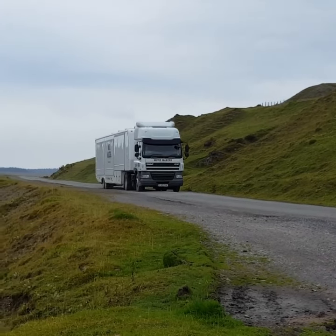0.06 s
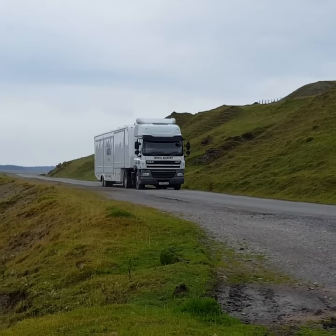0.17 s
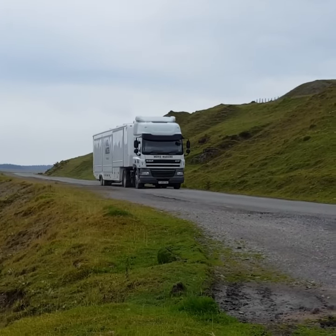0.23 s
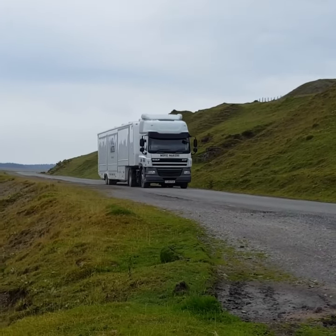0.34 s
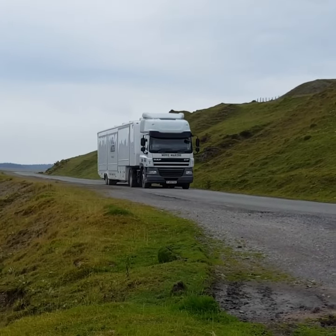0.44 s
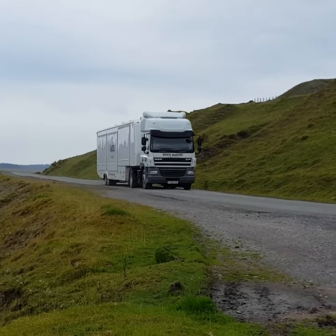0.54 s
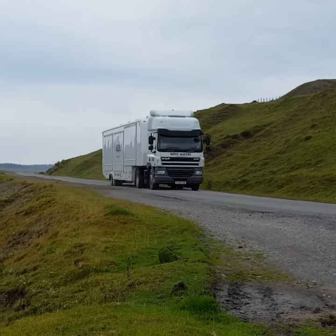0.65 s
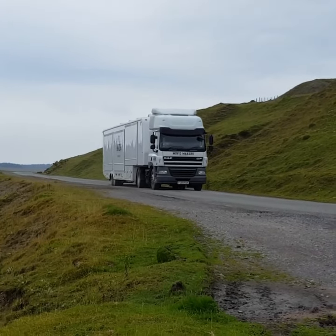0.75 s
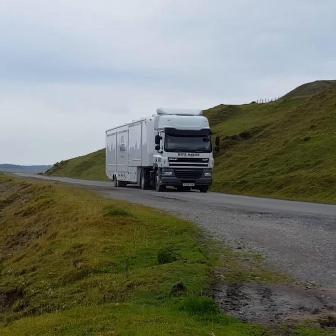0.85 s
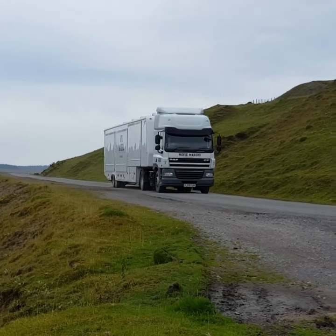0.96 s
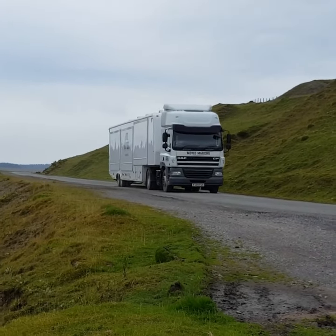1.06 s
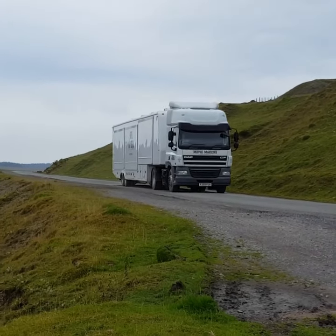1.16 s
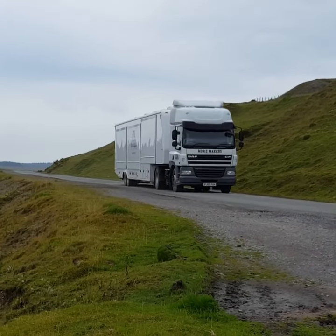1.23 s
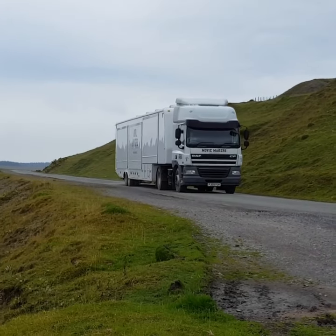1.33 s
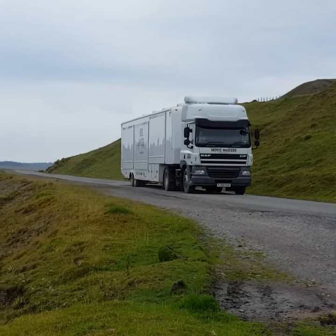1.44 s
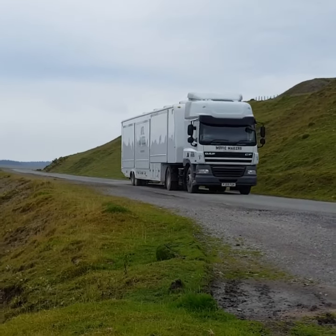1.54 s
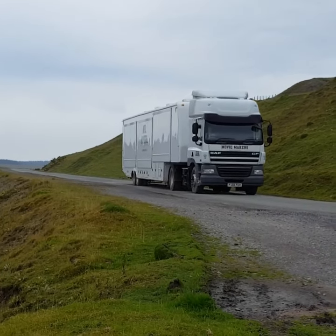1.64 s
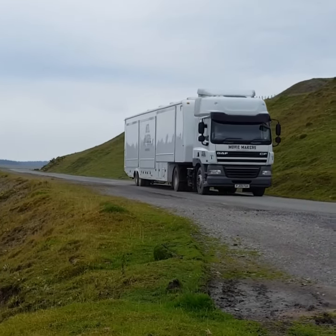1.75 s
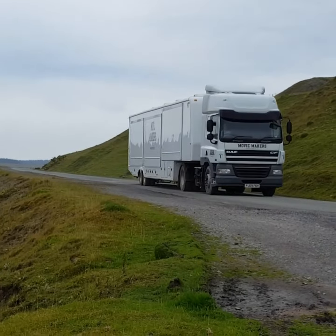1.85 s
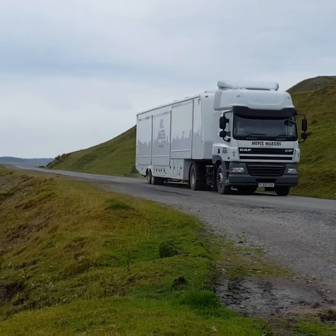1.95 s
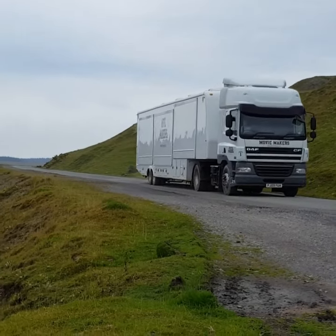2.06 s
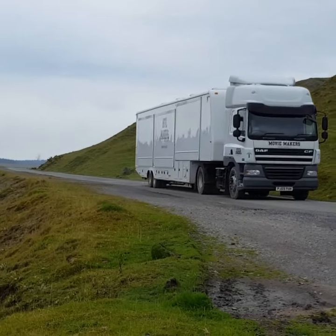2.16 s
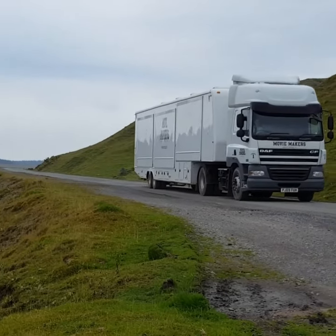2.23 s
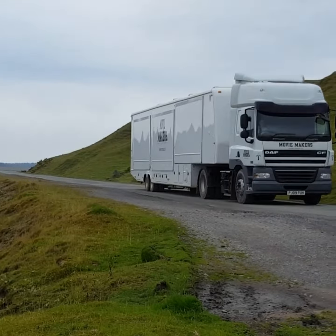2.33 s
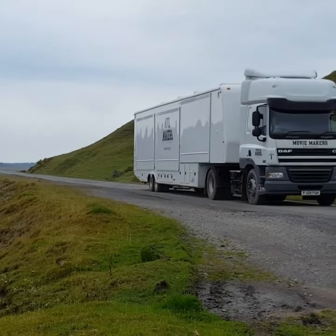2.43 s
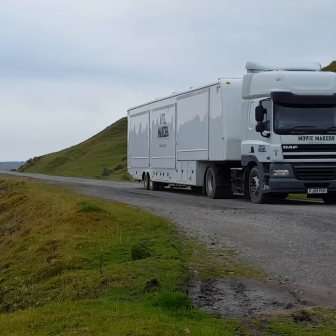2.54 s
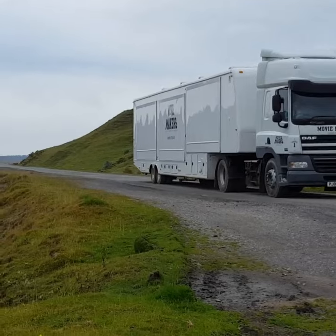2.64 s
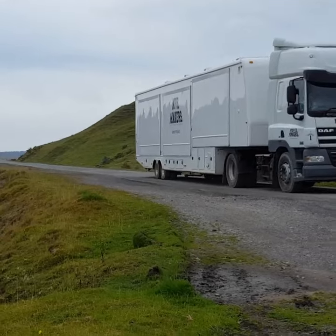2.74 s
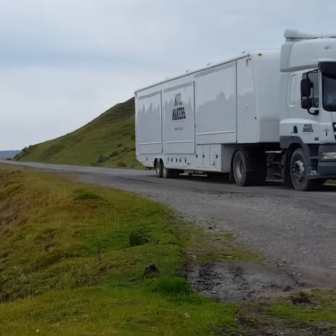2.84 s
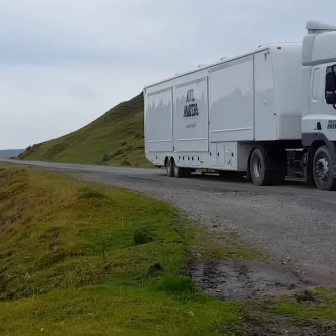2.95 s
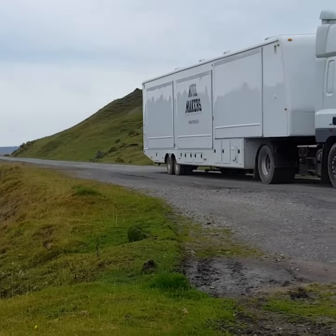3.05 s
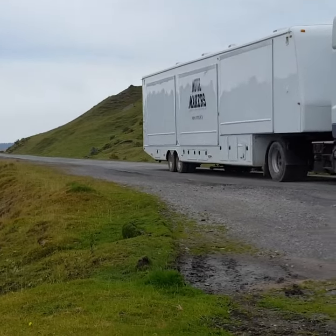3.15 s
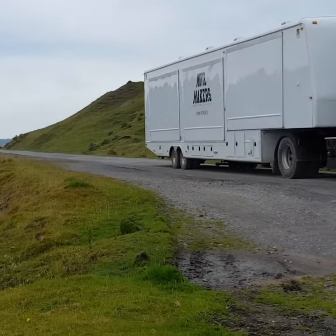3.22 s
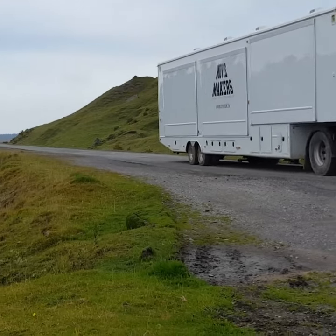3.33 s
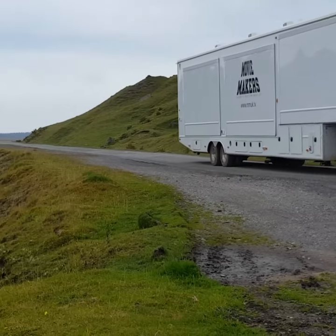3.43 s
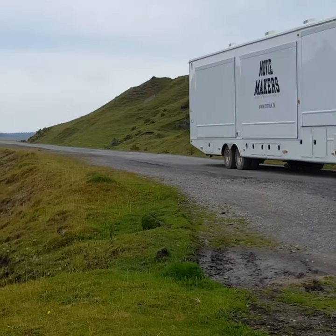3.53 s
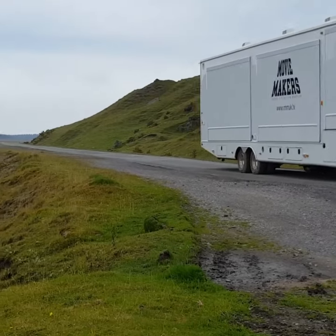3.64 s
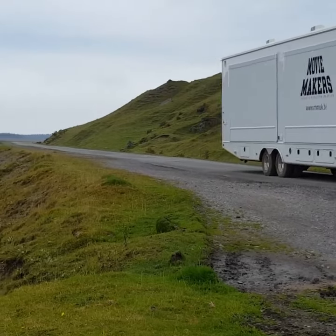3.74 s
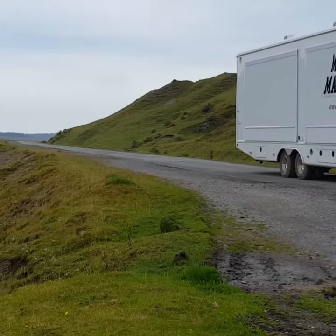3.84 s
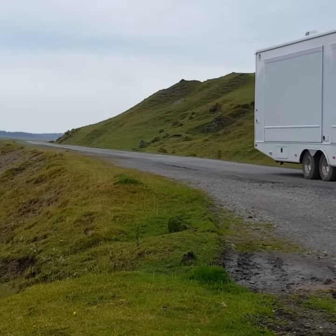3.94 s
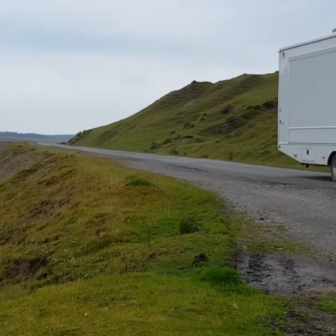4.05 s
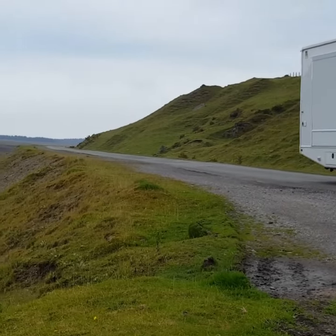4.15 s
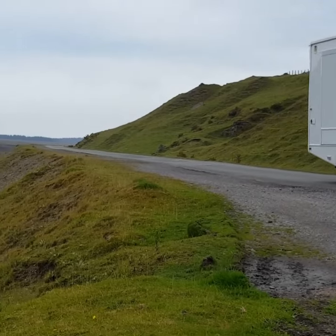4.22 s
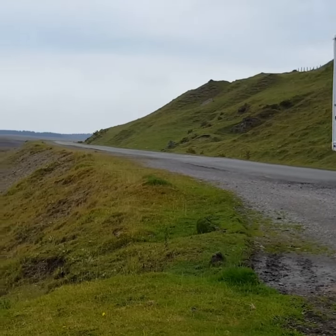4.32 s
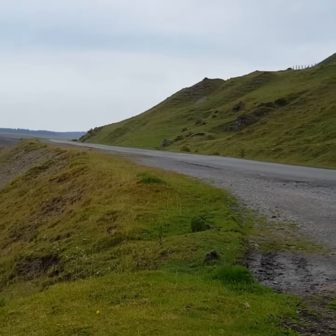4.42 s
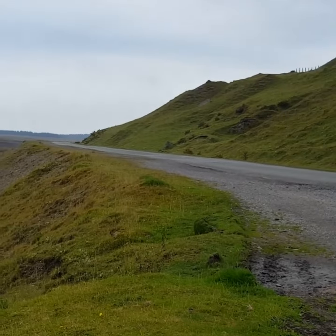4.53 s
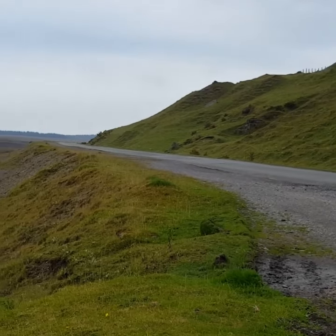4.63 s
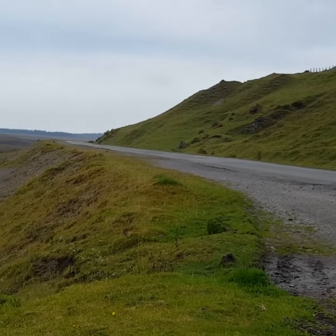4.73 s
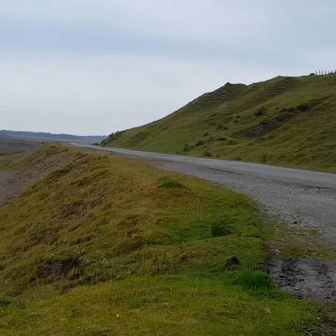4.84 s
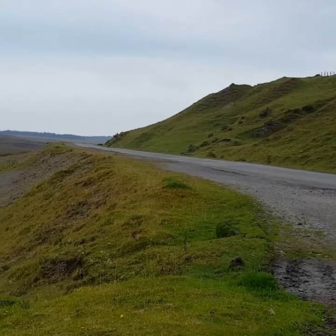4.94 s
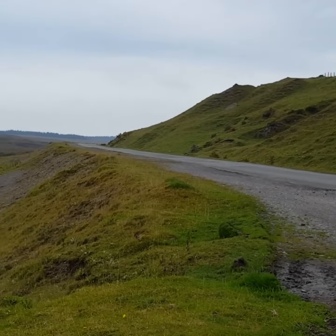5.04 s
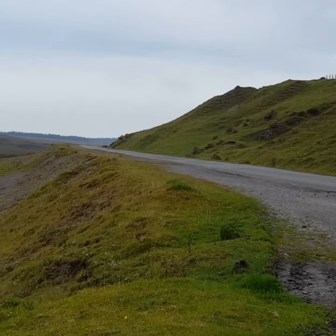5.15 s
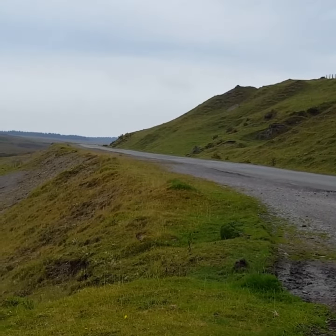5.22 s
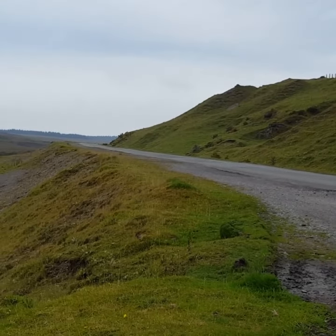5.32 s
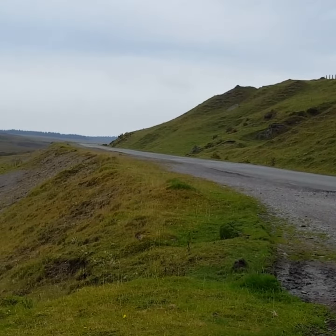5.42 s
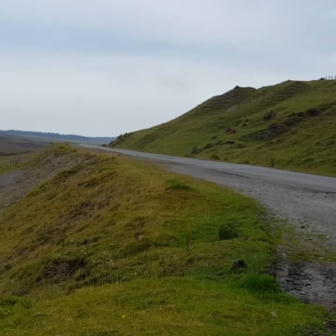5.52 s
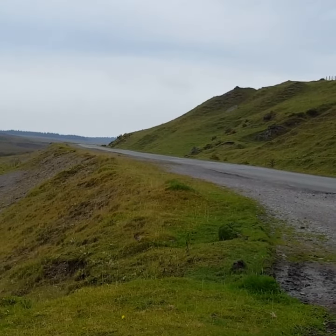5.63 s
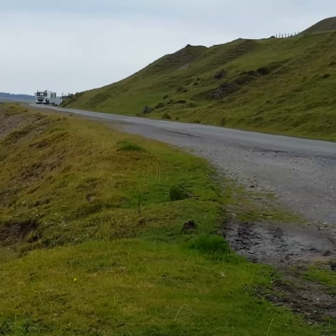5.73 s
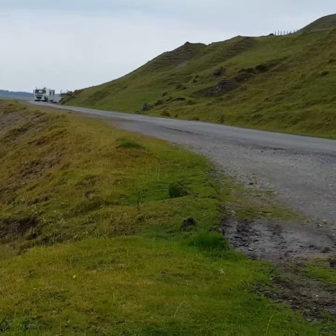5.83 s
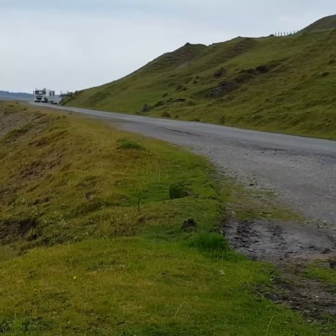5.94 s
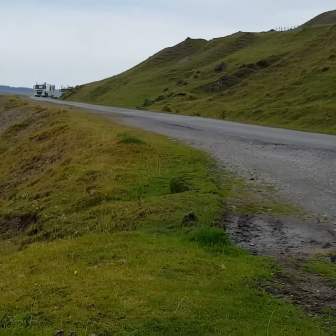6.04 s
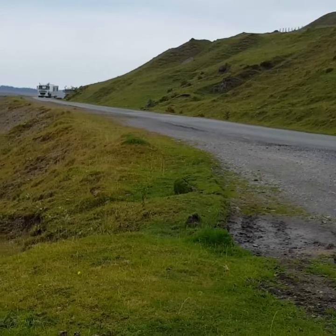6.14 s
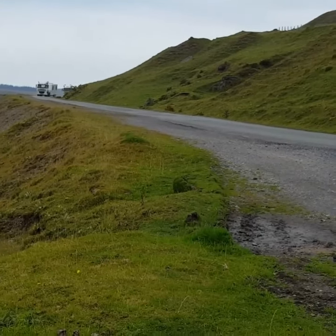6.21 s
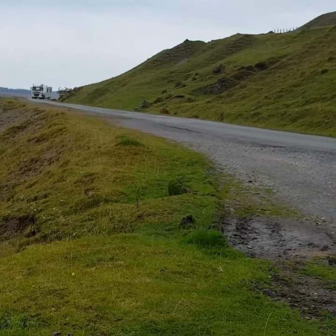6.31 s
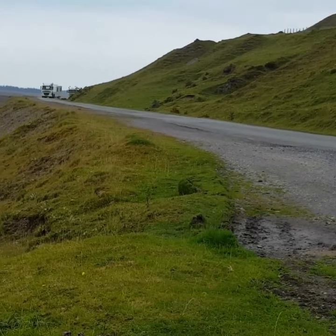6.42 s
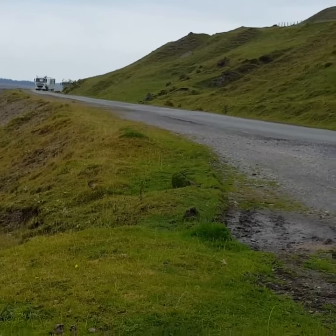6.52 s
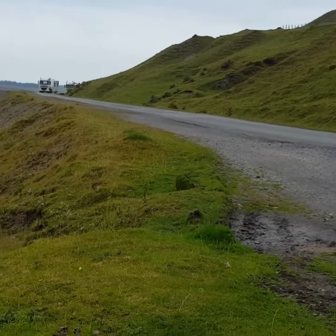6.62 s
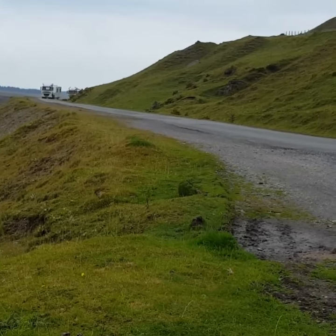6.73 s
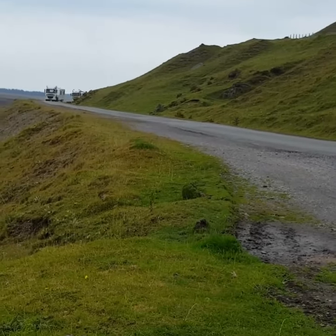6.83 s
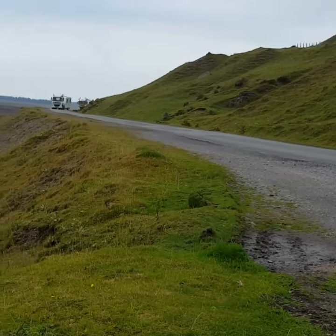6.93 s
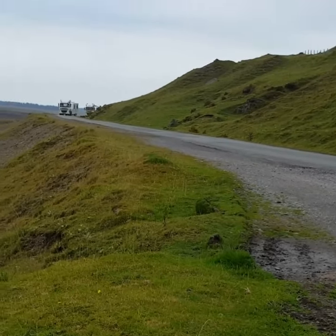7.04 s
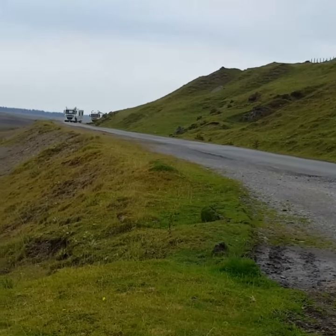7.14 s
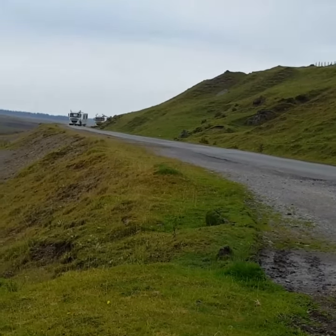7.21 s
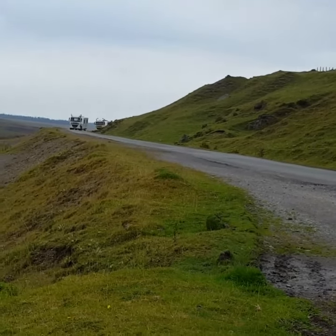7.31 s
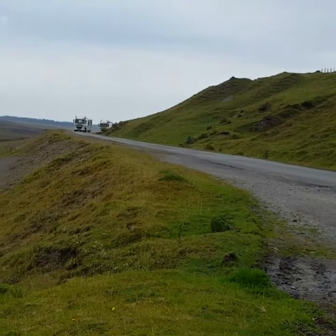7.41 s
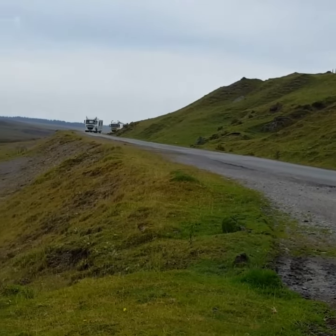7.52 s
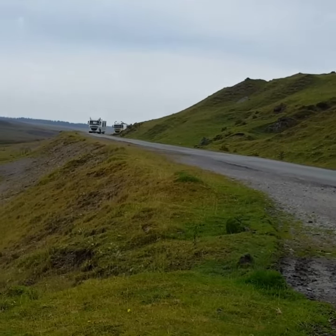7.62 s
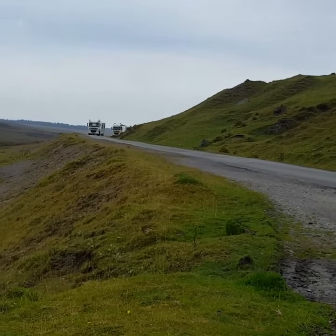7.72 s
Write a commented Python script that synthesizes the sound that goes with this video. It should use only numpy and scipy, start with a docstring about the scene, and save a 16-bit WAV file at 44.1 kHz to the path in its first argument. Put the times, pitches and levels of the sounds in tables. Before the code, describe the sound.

Heard in stereo from the roadside, an engine rumble and the rush of tyres build as a heavy diesel truck draws near. As it rolls close by, loose stones crack and spray and its trailer booms and bangs over bumps. Just as it begins to recede, the noise stops dead. Soft wind follows, with small dry clicks, one sharper click, two tiny bird chirps and light shuffling of shoes.

```python
"""A diesel lorry with a long box trailer rolls up a hill road and passes close by, throwing up grit.
Its tyres roar and the hollow trailer booms, each part loudest when nearest. The engine sounds harmonics
of its firing rate, bumps excite the modes of the body, and stones tick against metal.
The pass stops abruptly and a quiet verge follows, with light wind, a bird, small clicks and scuffing
feet. A faint, thin tone runs throughout. Two spaced microphones hear it all."""
import sys
import numpy as np
from scipy import signal
from scipy.fft import rfft, irfft, next_fast_len
from scipy.io import wavfile
from scipy.ndimage import uniform_filter1d

SR = 44100
rng = np.random.default_rng(int(sys.argv[2]) if len(sys.argv) > 2 else 0)


def transcribe(u):
    """Save the signal u as a 16-bit wav file named by the first command-line argument.

    u: samples, shape (n,) or (channels, n), limited to [-1, 1]; the rate is SR.
    q: integer samples, one column per channel.
    """
    v = np.clip(np.atleast_2d(u).T, -1, 1)
    q = np.round(v * 32767).astype(np.int16)
    wavfile.write(sys.argv[1], SR, q)


N = 342657
SIZE, HOP = 1024, 256
HZ = np.fft.rfftfreq(SIZE, 1 / SR)[:, None]
FRAMES = np.arange(N // HOP + 5) * HOP / SR
TIME = np.arange(N) / SR
PASS_END_S, MIC_SPACING_S = 6.29, .162 / 343
GRITTY_S, GRITTY_FADE_S = 2.93, .2  # the wheels reach loose grit
TAIL_S, TAIL_FADE_S = 5.83, 0.11  # the tail turns and shields the wheels

# Noise spectra. Each row: frequency in Hz, relative power density in dB.
WASH_SPECTRUM = [(12, -34), (20, -5), (22, -7), (48, 0.5), (108, 0.5), (685, -22), (969, -19.5),
                 (1570, -26), (5100, -35.5), (5520, -33.5), (8700, -36), (10200, -41), (12000, -65),
                 (15600, -88), (22000, -120)]
GUST_SPECTRUM = [(20, -13), (50, 1.5), (130, 0.5), (220, -13), (400, -16.5), (800, -46)]
SOLE_SPECTRUM = [(120, -53), (200, -25), (303, 0), (619, -1.5), (1060, -11), (1650, -12), (2780, -24),
                 (3980, -22), (7000, -41), (9100, -73), (15400, -120)]
RUMBLE_SPECTRUM = [(20, -25.5), (40, -10), (60, -8), (85, 16), (130, 18.5), (165, 17.5), (250, -54.5)]  # exhaust and chassis
BOOM_SPECTRUM = [(120, -9.5), (165, -5), (195, 7), (225, 10.5), (255, 6), (290, 5), (400, -71.5)]  # hollow trailer
ROAR_SPECTRUM = [(240, -17.5), (330, -1), (420, -3.5), (600, -3), (800, -5), (1000, -6), (1120, -6.5),
                 (1250, -10.5), (1400, -14), (1900, -60.5)]  # tyres on tarmac
RASP_SPECTRUM = [(1050, -26.5), (1450, 5.5), (1900, 3), (2500, -5), (2950, -16.5), (3800, -30.5)]  # tread blocks
CLATTER_SPECTRUM = [(2400, 1), (3000, 0), (3600, -1), (4200, -3.5), (5000, -7.5), (6400, -25)]  # diesel knock and fan
HISS_SPECTRUM = [(4600, -4), (5600, 1), (6300, -2.5), (7000, 3), (8200, -6), (9300, -11.5), (10400, -30),
                 (11200, -32.5), (12200, -46)]  # grit

# The thin tone. Each row: time in seconds, frequency in Hz, level in dB.
THIN_TONE = [(0, 9630, -75), (1.1, 9630, -75), (1.4, 9700, -78), (2.8, 9720, -74.5), (6.28, 9796, -88.5),
             (6.3, 10030, -79.5), (7.77, 10030, -77.5)]
# Wind buffeting. Each row: time in seconds, level in dB.
GUST_LEVELS = [(6.3, -63), (6.37, -46), (6.45, -69), (6.85, -54), (6.98, -45), (7.15, -51), (7.24, -43.5),
               (7.77, -46.5)]
# Balance of the wind's bass. Each row: time in seconds, left over right in dB.
GUST_BALANCE = [(6.3, 1), (6.85, 1), (7.05, -7), (7.77, -2)]
# Bird notes. Each row: start and length in seconds, first and last pitch in Hz, level in dB.
BIRD_NOTES = [(7.16, .03, 7250, 6600, -64), (7.164, .024, 6250, 5600, -62), (7.294, .03, 6400, 5600, -65),
              (7.288, .034, 5500, 4950, -66)]
# Soles on the verge. Each row: start in seconds, time before the decay in seconds, level in dB.
SOLE_SCUFFS = [(7.302, 0.02, -49), (7.444, 0.023, -63), (7.575, 0.032, -51), (7.674, 0.07, -57.5)]
# Hollow thuds. Each row: start in seconds, peak in dB, centre and half width in Hz, T60 in seconds.
FOOT_THUDS = [(7.671, -43, 460, 110, .1), (7.7, -43, 500, 100, .14)]
# Dry clicks. Each row: start in seconds, peak and pan in dB, low edge in Hz, low knock in dB.
DRY_CLICKS = [(6.9751, -38, -9, 1500, -35), (7.0808, -40, -8, 1000, -40), (7.126, -46, -8, 2500, -60),
              (7.2138, -48, -14, 1200, -60), (7.3686, -41, -10, 2800, -60), (7.4122, -21, -5, 2600, -45)]

# Grit on metal. Each row: start in seconds, peak in dB, centre and half width in Hz, pan in dB.
GRIT_TICKS = [(1.9025, -41, 6840, 950, -3), (2.4952, -41, 4190, 950, 1.5), (2.9702, -35, 3740, 700, -.5),
              (2.9857, -33, 6700, 950, 1), (3.0145, -32.5, 7100, 950, -10), (3.054, -30.5, 8400, 950, -10),
              (3.058, -30, 6510, 950, -2), (3.209, -26, 6850, 950, -8), (3.2927, -27, 7200, 950, -3),
              (3.322, -37, 5000, 950, -1), (3.3837, -34, 4010, 951, -1.0), (3.4468, -26, 7300, 960, -3),
              (3.468, -32, 6900, 950, -0.5), (3.544, -25, 6660, 950, -6), (3.7429, -33, 8308, 950, -7),
              (3.7638, -31, 5500, 2300, -4), (3.7788, -32, 6540, 950, -1.5), (3.8511, -33, 7070, 950, -4),
              (3.9792, -19, 7300, 950, 2.5), (4.1565, -30, 6860, 950, 6), (4.3153, -22, 6200, 2400, 2),
              (4.5261, -36, 6800, 950, 2), (4.584, -35, 5590, 940, 4), (4.6577, -24.5, 7240, 950.4, -0.5),
              (4.6853, -28, 5070, 950, -4), (4.8858, -36, 4260, 950, 3), (4.9671, -33, 4090, 950, 4),
              (4.998, -35, 4290, 950, 1), (5.077, -35, 7010, 950, 5), (5.456, -30, 4290, 950, 6),
              (6.0721, -40, 5500, 945, -0.5)]
STONE_CRACKS = [(.9695, -47, 9000, 3000, -5), (1.5463, -39, 6500, 4000, -9),
                (3.9782, -30, 10100, 1800, -18), (3.394, -31, 8800, 2300, -4), (4.303, -30, 7000, 3500, -8),
                (4.3403, -13, 6400, 3900, -8.5), (4.412, -27, 7400, 1600, 0),
                (4.657, -24, 10360, 1800, -14), (4.775, -38, 8500, 2500, -4), (5.321, -25, 5800, 3500, 4.5),
                (5.565, -38, 9500, 1500, -7.5), (5.59, -40, 9500, 1200, -4), (5.756, -31, 5900, 3500, -9)]  # sharper and brighter
# Bursts of hiss. Each row: start in seconds, peak in dB, centre in Hz, pan in dB, half width in Hz,
# T60 in seconds.
HISS_PUFFS = [(4.09, -32, 6897, 13, 2010, 0.17), (4.248, -29, 6340, 12, 2500, 0.12),
              (4.36, -34.5, 9450, -14, 2000, 0.27), (6.269, -44, 6000, -12, 5010, 0.31)]
# Blows on the trailer. Each row: start in seconds, peak and pan in dB, tilt in dB per octave,
# factor on the ring time, sine of the bearing.
BUMPS = [(3.053, -10, -6, 11, .55, .1), (3.347, -21, -3, .5, 1, .38), (4.2316, -1, -2, 2, 1.3, .26),
         (4.303, -11, -3, 7, .4, .25), (4.54, -9, -2, 3.5, 1, .2), (5.203, -10, .1, 1.5, .4, .8)]
# Modes of the trailer. Each row: frequency in Hz, relative level in dB, T60 in seconds.
BODY_MODES = [(262, -3, .2), (530, -1, .1), (845, -1, .08), (1130, -7, .05), (1490, -8, .04),
              (1760, -11, .035), (2250, -19, .02)]
# The diesel. Each row: time in seconds, firing rate in Hz, levels of harmonics 5 and 6 in dB.
ENGINE_RUN = [(0, 46, -51, -67), (.5, 46, -44.5, -78), (1, 44.9, -52, -51), (1.5, 43.96, -41.5, -75),
              (2.4, 43.95, -37, -50), (3, 43.63, -41, -49), (4, 42.93, -40, -39.5), (4.6, 42.7, -40, -33.5),
              (4.72, 42.55, -30.5, -34), (4.85, 42.52, -30, -31), (4.96, 42.58, -34, -24.5),
              (5.08, 42.55, -48, -33), (5.3, 42.6, -50, -27.5), (5.4, 42.6, -53, -28.5),
              (5.8, 42.24, -58, -32.5), (6.3, 41.8, -58, -40.5)]
# Passing tones. Each row: harmonic number, level in dB and time in seconds when nearest,
# seconds to cover the nearest distance, exponent of the distance law.
FIRING_HARMONICS = [(1, -44.5, 5.8, 0.79, 1.7), (2, -36.5, 3.86, 0.41, 0.65)]
GEAR_HARMONICS = [(1, -53, 3.3, 1.24, 1.7), (2, -54, 3.57, 0.35, 1.7)]
# Driveline hum. Each row: time in seconds, levels of the low and the high hum in dB.
HUM_LEVELS = [(0, -42, -77), (.9, -46, -55.5), (1.3, -43.5, -57), (1.7, -37.5, -58), (2.1, -37, -50.5),
              (2.4, -54, -51), (3, -35.5, -41), (3.5, -32.5, -43.5), (4, -52, -33.5), (4.8, -48.5, -42),
              (6.3, -67, -74)]
# Cab, drive wheels, trailer, rear wheels. Each row: time when nearest in seconds,
# seconds to cover the nearest distance.
LORRY_PARTS = [(3.52, 0.83), (4.36, 0.33), (4.92, 1.39), (5.62, 0.2)]
# Rumble, boom, roar, rasp, clatter, hiss. Each row: level of each of the four parts in dB,
# exponent of the distance law, dB lost before the gritty stretch, dB lost behind the tail.
NOISE_LAYERS = [(-35, -37.5, -36, -46.5, 0.36, 5, 0.077), (-35.5, -26, -26, -50.5, 1.105, .1, 1.9),
                (-25.5, -23.5, -21, -29.5, 1.75, 2.15, 4.3), (-35.5, -26, -38, -36.5, 1.77, 0.46, 6.8),
                (-41, -37, -42.5, -40, 1.33, 0.39, 4.8), (-44.5, -43.5, -48.5, -50, 1.39, 6.4, 7)]
# Boom, roar, rasp, clatter. Each row: frequency factor ahead, aside and behind the tail.
PITCH_FACTORS = [(0.98, 1.1346, 1.095), (0.98, 1.254, 0.93), (0.98, 1.15, 0.99), (1.0, 1.06, 1.15)]
# Swells along the road. Each row: time in seconds, gain of boom, roar, rasp and hiss in dB.
ROAD_SWELLS = [(0, 0, -1.5, -0.5, 0.61), (.7, 1, -3, -3.5, 0.23), (1.35, -1, -2, -2.5, -1.8),
               (1.55, -1, -1.5, 1.5, 2.43), (2.1, -1.2, -1, -0.5, 1), (2.5, -0.37, -.5, -0.5, -0.32),
               (2.9, 0, -1, -3, -0.021), (3.1, -0.38, -3.5, -2, 0.7), (3.5, 0.099, .5, -1.5, -1),
               (3.8, 0, 0, 0.5, -1), (4.05, -1, 0.5, -2, -0.98), (4.2, 0, 0.5, -5, -0.18),
               (4.36, -1, -1.5, -2.5, 2.01), (4.5, -0.33, -1.5, -2, -1), (4.9, 1, 0, 1, -1.4),
               (5.1, 0.21, 0, 2.5, 0.76), (5.35, 0, .5, 1, 2), (5.55, -0.62, -1, -0.5, -0.64),
               (5.76, -0.25, -2, 2, 1), (5.9, 0, -2, 2.5, -1), (6.03, 0, -2, 0.5, -2),
               (6.1, 0.082, -1.5, 0, 2), (6.25, -0.47, -3, -2, -2)]
# Greatest random swing of rumble, boom and hiss in dB.
UNEVENNESS_DB = [3, 1.5, 1.5]
# The bearing at which the lorry is heard swings to the right in steps, the last one quick. Each row: time and
# fade in seconds, rise in the sine of the bearing.
BEARING_SWINGS = [(3.38, .72, .64), (5.3, .3, .16), (5.72, .04, .06)]
# The long flank arrives, then leaves. Each row: time and fade in seconds.
FLANK_PASSAGE = [(3.1, 0.35), (4.5, 0.13)]

# Echo notches, one list each. Each row: time in seconds, centre in Hz, depth (capped at 0.8 in use).
LEFT_NOTCHES = [
    [(0, 1020, 0.67), (2.9, 1100, 0.73), (3.4, 1320, 0.83), (3.75, 1500, .8), (4.1, 1700, 0.6),
     (4.6, 1810, 0.32), (5.15, 2180, 0.67), (5.5, 2400, 0.52), (6.3, 2700, 0)],
    [(0, 2740, 0.45), (2, 2810, 0.57), (3.3, 3381, 0.67), (3.7, 3720, 0.2), (4.3, 3800, 0),
     (4.7, 3859, 0.57), (5.15, 3670, 0), (5.65, 3701, .55), (6, 4277, 0.75)],
    [(0, 4270, 0.85), (2.2, 4600, .6), (2.8, 5200, 0.45), (3.2, 5630, 0.3)],
]
RIGHT_NOTCHES = [
    [(0, 2320, 0.75), (2.5, 2300, 0.85), (3.4, 2630, 0.96), (3.9, 2940, 0.48), (4.3, 3200, 0.19),
     (5, 3080, 0.68), (5.6, 3530, 0.68), (6.3, 3860, 0.73)],
    [(0, 4670, 0.87), (2.7, 4660, 0.52), (3.2, 4900, 0.87), (3.9, 5100, 1), (4.3, 5370, 0.17)],
]
# Left, then right. Each row: centre over half width for each notch.
NOTCH_SHARPNESS = [
    [2.7, 6.5, 9.5],
    [4.1, 8],
]
# Likeness of the two channels. Each row: frequency in Hz, correlation.
COHERENCE_DIFFUSE = [(60, 0.9), (170, 0.93), (500, 0.78), (1450, 0.096), (4190, 0.13), (12100, -0.24)]
COHERENCE_AHEAD = [(25, .88), (80, .96), (270, .97), (950, .93), (1200, .8), (1500, .93), (1900, .92),
                   (2300, .68), (4500, .75), (7000, .3), (12000, .18)]
COHERENCE_ASIDE = [(25, .86), (80, .95), (270, .99), (580, .98), (1250, .97), (1700, .9), (2400, .76),
                   (4000, .38), (7000, .25), (12000, .3)]
# Balance of the channels. Each row: frequency in Hz, left over right in dB.
BALANCE_AHEAD = [(60, 0.5), (200, 3), (400, -2.5), (800, -1), (1600, -1), (3000, 0.5), (6700, 0),
                 (8800, -1.5), (12000, -4.5)]
BALANCE_ASIDE = [(60, 0), (110, 1), (200, 0.5), (350, 1.5), (630, 1), (1140, 3.5), (2060, -4), (3720, -1),
                 (6710, 3.5), (8800, -6.5), (12100, -7)]
# Microphone response. Each row: frequency in Hz, gain in dB.
MIC_RESPONSE = [(15, -31), (30, -4.5), (42, 0.5), (10300, 0.5), (11000, -6), (11700, -17.5), (12600, -32)]


def gain_of(db):
    """Amplitude grows tenfold every 20 dB."""
    return 10 ** (np.asarray(db) / 20)


def unit_rms(x):
    """Normalisation to unit mean power."""
    return x / np.sqrt(np.mean(x ** 2) + 1e-20)


def at_hz(points, hz):
    """Interpolation on a logarithmic frequency axis."""
    f, value = np.transpose(points)
    return np.interp(np.log(hz + 1), np.log(f + 1), value)


def curves(rows, t):
    """Linear interpolation of each column in time."""
    times, *columns = np.transpose(rows)
    return [np.interp(t, times, column) for column in columns]


def step(t, s, fade):
    """A smooth transition from 0 to 1 around time s."""
    return .5 + .5 * np.tanh((t - s) / fade)


def wander(count, frames):
    """Low-passed noise gives slow random curves between -1 and 1."""
    noise = rng.standard_normal((count, len(FRAMES)))
    smooth = uniform_filter1d(uniform_filter1d(noise, frames), frames)
    return [np.tanh(unit_rms(row)) for row in smooth]


def power(spectrum, level_db, hz=HZ):
    """A total power is shared among the bins in proportion to a spectrum."""
    density = gain_of(2 * at_hz(spectrum, hz))
    return density / density.sum(0) * gain_of(2 * level_db)


def noise_pair(bins, coherence, balance_db, lag=0, patchy_db=1.5, flicker_db=1.2, response=1):
    """Partial coherence: two channels share some of their noise, the left one lag seconds late."""
    re, im, own_re, own_im, chance = rng.standard_normal((len(FRAMES), len(HZ), 5)).T
    flicker = unit_rms(uniform_filter1d(uniform_filter1d(chance, 2, 1), 150, 0))
    patches = unit_rms(uniform_filter1d(uniform_filter1d(chance[::-1], 10, 0), 10, 1))
    left = re + 1j * im
    right = coherence * left + np.sqrt(1 - coherence ** 2) * (own_re + 1j * own_im)
    steer = gain_of(balance_db / 2) * np.exp(-1j * np.pi * HZ * lag)
    spectra = np.array([left * steer, right / steer]) * response * np.sqrt(bins)
    spectra *= gain_of(patchy_db * patches + flicker_db * flicker)
    return signal.istft(spectra, nperseg=SIZE, noverlap=SIZE - HOP)[1][:, :N]


def tone(hz, db, waver_db, frames, wobble=0.0035):
    """A sine under random amplitude and frequency modulation, smoothed over some frames."""
    waver, drift = (np.interp(TIME, FRAMES, curve) for curve in wander(2, frames))
    phase = 2 * np.pi * np.cumsum(hz * (1 + wobble * drift)) / SR
    return np.sqrt(2) * gain_of(db + waver_db * waver) * np.sin(phase)


def band_pass(x, order, edges_hz):
    """A Butterworth filter passes the band between two edges."""
    return signal.sosfilt(signal.butter(order, edges_hz, "band", fs=SR, output="sos"), x)


def burst(db, hz, half_width, t60=0.0068, strike=0):
    """An optional impulse and decaying noise excite one broad resonance."""
    t = np.arange(round(t60 * SR) + 200) / SR
    attack = 1 - np.exp(-t / (0.026 * t60))
    force = rng.standard_normal(len(t)) * gain_of(-60 * t / t60) * attack
    force[0] = strike
    ring = band_pass(force, 3, np.clip([hz - half_width, hz + half_width], 100, 15000))
    return gain_of(db) * ring / abs(ring).max()


def place(mix, s, sound, pan_db=0, lag=0):
    """Level and time cues: the left channel is louder by 0.85 of pan_db and lag seconds late."""
    for channel, start, share in ((0, s + lag / 2, .5), (1, s - lag / 2, -.35)):
        part = mix[channel, round(start * SR):][:len(sound)]
        part += gain_of(share * pan_db) * sound[:len(part)]


def thin_tone():
    """Noise modulation of frequency blurs a faint high tone, mostly on the left."""
    hz, db = curves(THIN_TONE, TIME)
    jitter_hz = 60 * unit_rms(uniform_filter1d(rng.standard_normal(N), 150))
    return tone(hz + jitter_hz, db, 2, 4, .001) * gain_of([[0], [-14]])


def wind():
    """Turbulence buffets the microphones over a distant, diffuse wash."""
    bins = power(WASH_SPECTRUM, level_db=-53) + power(GUST_SPECTRUM, curves(GUST_LEVELS, FRAMES)[0])
    balance_db = curves(GUST_BALANCE, FRAMES)[0] / (1 + (HZ / 200) ** 2)
    return noise_pair(bins, at_hz(COHERENCE_DIFFUSE, HZ), balance_db)


def bird():
    """Two voices sound together, each a sine that glides down and levels off."""
    out = np.zeros((2, N))
    for s, length, from_hz, to_hz, db in BIRD_NOTES:
        progress = np.linspace(0, 1, round(length * SR))
        hz = to_hz + (from_hz - to_hz) * (1 - progress) ** 1.4
        note = np.hanning(len(hz)) * np.sin(2 * np.pi * np.cumsum(hz) / SR)
        place(out, s, gain_of(db) * note, pan_db=1)
    return out


def feet(rise_s=.008, fall_db_per_s=204):
    """Sliding friction: strokes of noise over a faint shuffle, with hollow thuds in the last."""
    friction = noise_pair(power(SOLE_SPECTRUM, 0 * FRAMES), coherence=.92, balance_db=1, lag=-.00009)
    strokes = gain_of(-59) * step(TIME, 7.02, 0.17)  # the shuffle
    for s, length, db in SOLE_SCUFFS:
        attack = np.clip((TIME - s) / rise_s, 0, 1)
        strokes += attack * gain_of(db - fall_db_per_s * np.maximum(TIME - s - length, 0))
    out = friction * strokes
    for s, db, hz, half_width, t60 in FOOT_THUDS:
        place(out, s, burst(db, hz, half_width, t60))
    return out


def clicks(snap_s=.0003, tail_s=.0006, knock_hz=288, knock_s=.002):
    """A brief pulse has a broad spectrum: each snap has a noisy tail and a damped low knock."""
    out, t = np.zeros((2, N)), np.arange(600) / SR
    knock = np.cos(2 * np.pi * knock_hz * t) * np.exp(-t / knock_s)
    for s, db, pan_db, low_hz, knock_db in DRY_CLICKS:
        pulse = np.exp(-t / snap_s) + .25 * rng.standard_normal(len(t)) * np.exp(-t / tail_s)
        snap = band_pass(pulse, 1, [low_hz, 7500])
        click = gain_of(db) * snap / abs(snap).max() + gain_of(knock_db) * knock
        place(out, s, click, pan_db, lag=.00007)
    out[0] = band_pass(out[0], 2, [3500, 8000]) + gain_of(-6) * out[0]  # the left side is shaded
    return out


def bearing(t):
    """The sine of the lorry's bearing grows from near 0 (ahead) towards 1 (aside)."""
    return np.minimum(0.014 + sum(rise * step(t, s, fade) for s, fade, rise in BEARING_SWINGS), 1)


def lag_at(t):
    """The path difference delays the lorry's sound at the left microphone, in seconds."""
    return MIC_SPACING_S * bearing(t) * (t < PASS_END_S)


def passing_db(t, db, nearest_s, cover_s, law):
    """Geometric spreading from a source on a straight path; law 1 is the inverse square."""
    return db - 10 * law * np.log10(1 + ((t - nearest_s) / cover_s) ** 2)


def layer_db(t, layer):
    """The lorry's parts add in power; grit raises the layer and the tail shields it."""
    *parts_db, law, grit_db, tail_db = layer
    total = sum(gain_of(2 * passing_db(t, db, *part, law)) for db, part in zip(parts_db, LORRY_PARTS))
    clean_road = 1 - step(t, GRITTY_S, GRITTY_FADE_S)
    return 10 * np.log10(total) - grit_db * clean_road - tail_db * step(t, TAIL_S, TAIL_FADE_S)


def echo_notches():
    """Interference: echoes off the road and a nearby surface cancel bands that climb with the pass."""
    gains = np.ones((2, len(HZ), len(FRAMES)), complex)
    for channel, notches in enumerate((LEFT_NOTCHES, RIGHT_NOTCHES)):
        for rows, sharpness in zip(notches, NOTCH_SHARPNESS[channel]):
            hz, depth = curves(rows, FRAMES)
            gains[channel] *= 1 - np.clip(depth, 0, .8) / (1 + 1j * sharpness * (HZ / hz - 1))
    return gains


def grit(spray_count=380):
    """Impacts of flung stones ring briefly, among puffs and a fine spray that follows the hiss."""
    out = np.zeros((2, N))
    for s, db, hz, half_width, pan_db in GRIT_TICKS + STONE_CRACKS:
        lag = 0.54 * lag_at(s)  # much of it flies from the rear wheels
        place(out, s, burst(db, hz, half_width, strike=2.5), pan_db, lag)
    for s, db, hz, pan_db, half_width, t60 in HISS_PUFFS:
        place(out, s, burst(db, hz, half_width, t60), pan_db, lag_at(s))
    first_s = GRITTY_S - GRITTY_FADE_S
    for when, smallness, pitch, pan in rng.random((spray_count, 4)):
        s = first_s + when * (TAIL_S - first_s)
        db = layer_db(s, NOISE_LAYERS[-1]) + 1.5 - 2.2 * np.log(smallness + 0.025)
        hz = 6600 + 2300 * (2 * pitch - 1) ** 3
        place(out, s, burst(db, hz, half_width=1100), 14 * (pan - .5), lag_at(s))
    return out


def trailer_knocks(rise_s=.0014):
    """Modal superposition: a bump starts all modes in phase, giving a sharp dip and a short ring."""
    out, t = np.zeros((2, N)), np.arange(5000) / SR
    for s, db, pan_db, tilt, ring, side in BUMPS:
        knock = np.zeros(len(t))
        for hz, mode_db, t60 in BODY_MODES:
            envelope = gain_of(mode_db + tilt * np.log2(hz / 700) - 60 * t / (ring * t60))
            knock -= envelope * np.cos(2 * np.pi * hz * (t - rise_s))
        knock *= np.minimum(t / rise_s, 1) ** 2
        place(out, s, gain_of(db) * knock / abs(knock).max(), pan_db, side * MIC_SPACING_S)
    return out


def gear_whine(firing_hz):
    """Meshing teeth sound a tone and its octave, tied to engine speed and stronger on the left."""
    mesh_hz = 29.6 * firing_hz
    mesh_db, octave_db = (passing_db(TIME, *row[1:]) for row in GEAR_HARMONICS)
    whine = tone(mesh_hz, mesh_db, 5, 5, .012) + tone(2 * mesh_hz, octave_db, 6, 3, .014)
    return whine * gain_of([[2.5], [-4]])


def driveline_hum(firing_hz, low_hz=183):
    """Forced vibration: a low hum, and a higher one whose partials follow the engine speed."""
    low_db, high_db = curves(HUM_LEVELS, TIME)
    high_hz = 8.67 * firing_hz
    hum = tone(low_hz, low_db, 5, 7, .025) + tone(high_hz, high_db, 4, 8)
    hum += tone(1.5 * high_hz, high_db - 1, 5, 6, .008)
    return hum + tone(2 * high_hz, high_db - 3, 6, 6, .015)


def engine():
    """Periodic firing gives a harmonic series, joined by the driveline and the gears."""
    hz, fifth_db, sixth_db = curves(ENGINE_RUN, TIME)
    first_db, second_db = (passing_db(TIME, *row[1:]) for row in FIRING_HARMONICS)
    second_db += 3.5 * step(TIME, TAIL_S, TAIL_FADE_S)  # the exhaust is louder from behind
    drone = tone(hz, first_db, 5, 25) + tone(2 * hz, second_db, 4, 10, .012)
    drone += tone(5 * hz, fifth_db, 2, 10) + tone(6 * hz, sixth_db, 4, 4, .04)
    drone += driveline_hum(hz)
    lag = lag_at(TIME)
    pair = np.array([np.interp(TIME + shift, TIME, drone) for shift in (-lag / 2, lag / 2)])
    return pair + gear_whine(hz)


def rolling_power():
    """Six incoherent noises add in power; four shift in pitch as the lorry turns."""
    rumble, boom, roar, rasp, clatter, hiss = (layer_db(FRAMES, row) for row in NOISE_LAYERS)
    lumps_db = [db * curve for db, curve in zip(UNEVENNESS_DB, wander(3, frames=10))]
    rumble, boom, hiss = np.add([rumble, boom, hiss], lumps_db)
    boom, roar, rasp, hiss = np.add([boom, roar, rasp, hiss], curves(ROAD_SWELLS, FRAMES))
    side = bearing(FRAMES)
    tail = step(FRAMES, 5.72, .03)  # the roar dulls at once as the tail goes by
    bins = power(RUMBLE_SPECTRUM, rumble) + power(HISS_SPECTRUM, hiss)
    spectra = BOOM_SPECTRUM, ROAR_SPECTRUM, RASP_SPECTRUM, CLATTER_SPECTRUM
    for spectrum, db, (ahead, aside, behind) in zip(spectra, (boom, roar, rasp, clatter), PITCH_FACTORS):
        factor = (1 - tail) * (ahead + side * (aside - ahead)) + tail * behind
        bins += power(spectrum, db, HZ / factor)
    return bins


def rolling_lorry(spread_hz=2400):
    """An extended source: bearing sets balance and delay, and the near flank decorrelates the treble."""
    side = bearing(FRAMES)
    balance_db = (1 - side) * at_hz(BALANCE_AHEAD, HZ) + side * at_hz(BALANCE_ASIDE, HZ)
    abeam = np.minimum(side / 0.51, 1)
    flank = step(FRAMES, *FLANK_PASSAGE[0]) * (1 - step(FRAMES, *FLANK_PASSAGE[1]))
    coherence = (1 - abeam) * at_hz(COHERENCE_AHEAD, HZ) + abeam * at_hz(COHERENCE_ASIDE, HZ)
    coherence *= np.exp(-(flank * HZ / spread_hz) ** 4)
    flicker_db = 3.2 * HZ / (HZ + 4000)  # the treble flickers most
    return noise_pair(rolling_power(), coherence, balance_db, lag_at(FRAMES),
                      patchy_db=.6, flicker_db=flicker_db, response=echo_notches())


def scene():
    """The sources superpose; the lorry gives way to the verge within 2 ms."""
    lorry = rolling_lorry() + engine() + trailer_knocks() + grit()
    verge = wind() + feet()
    passing = np.clip((PASS_END_S - TIME) / 0.002, 0, 1)
    return passing * lorry + (1 - passing) * verge + clicks() + bird() + thin_tone()


def record(dry):
    """The microphone rolls off at both ends, saturation rounds the peaks, and a low-pass follows."""
    size = next_fast_len(N + SR)
    response = gain_of(at_hz(MIC_RESPONSE, np.fft.rfftfreq(size, 1 / SR)))
    coloured = irfft(rfft(dry, size) * response, size)[:, :N]
    rounded = 1.5 * np.tanh(coloured / 1.5)
    low_pass = signal.firwin(511, 12700, window=("kaiser", 9), fs=SR)
    return signal.oaconvolve(rounded, low_pass[None], "same")


dry = scene()
out = record(dry)
transcribe(out)
```